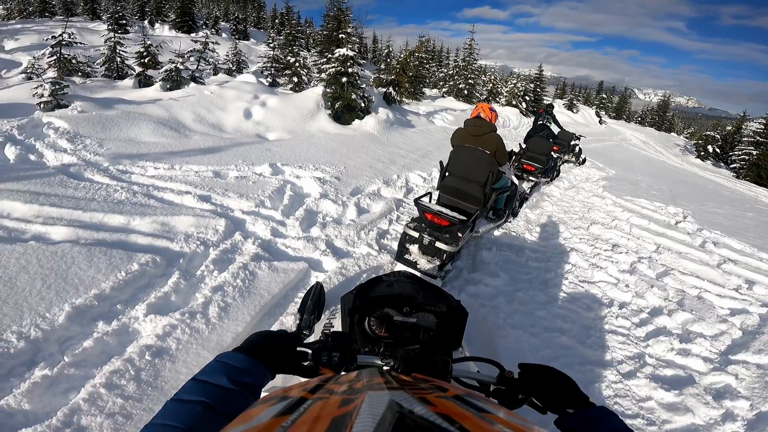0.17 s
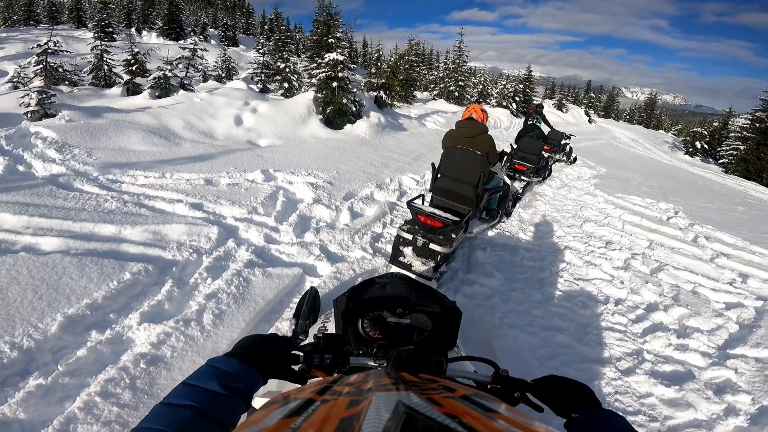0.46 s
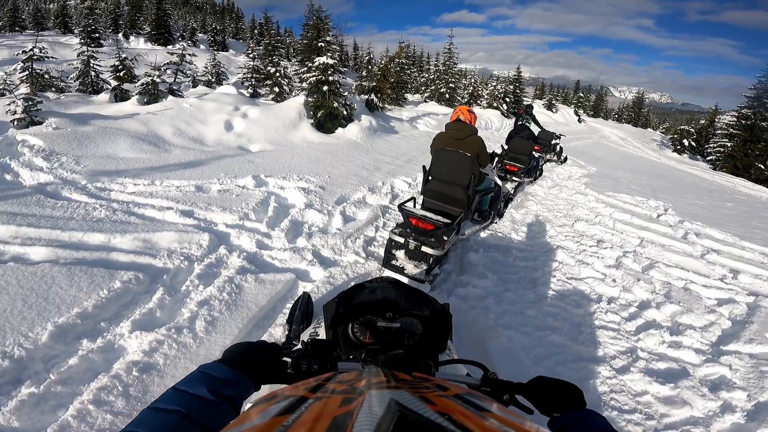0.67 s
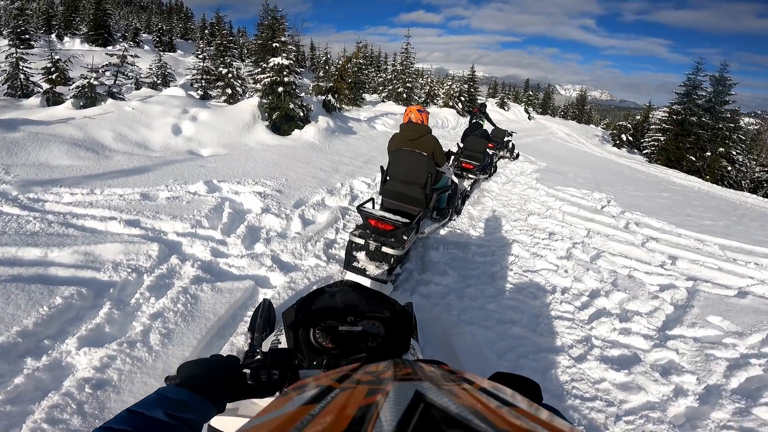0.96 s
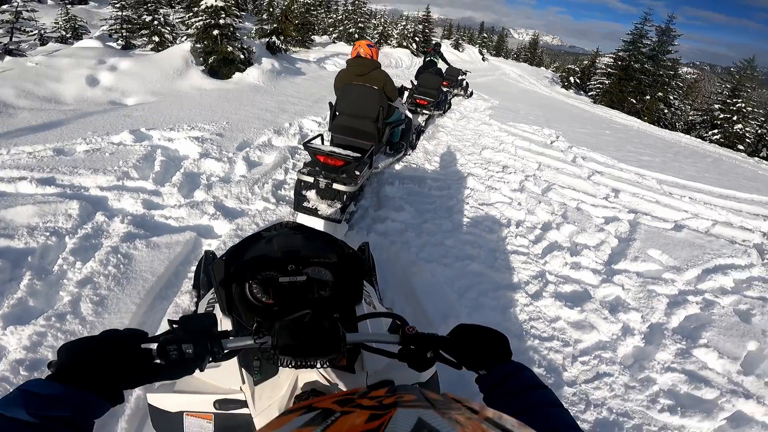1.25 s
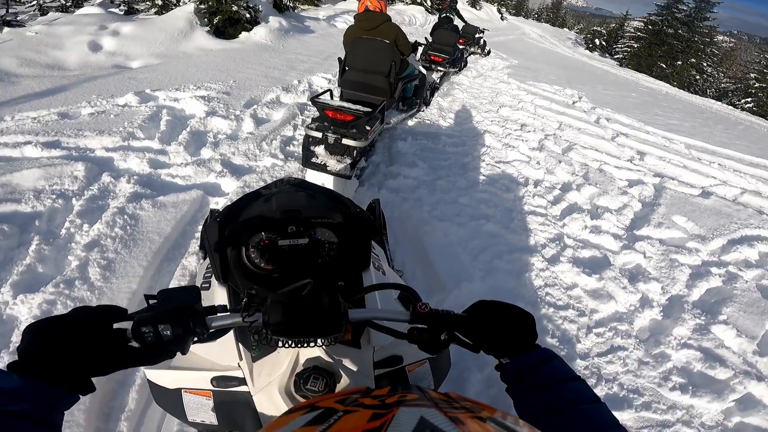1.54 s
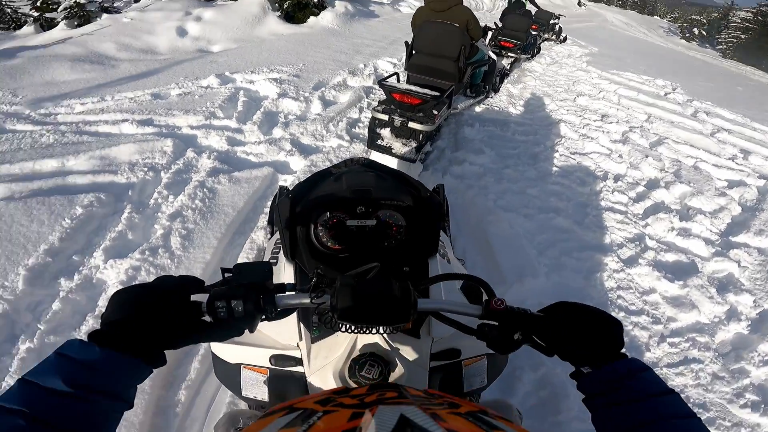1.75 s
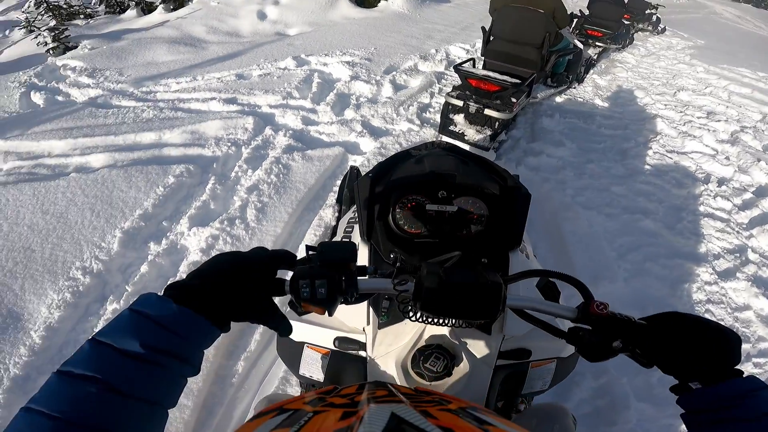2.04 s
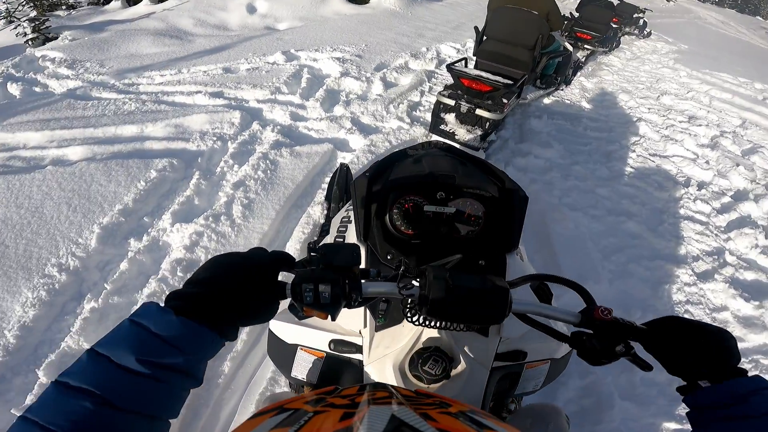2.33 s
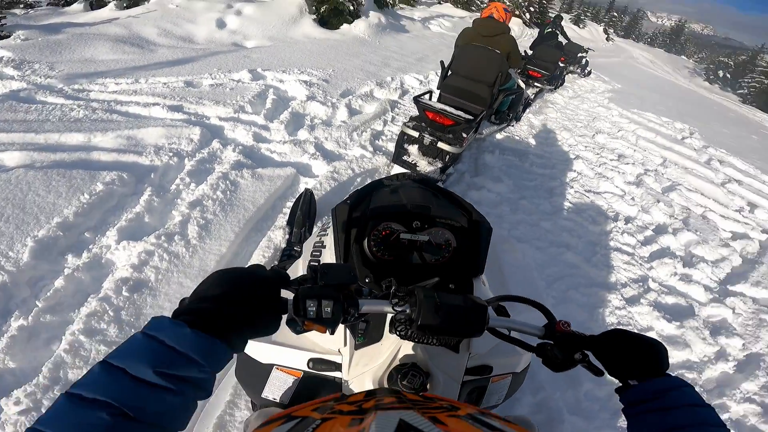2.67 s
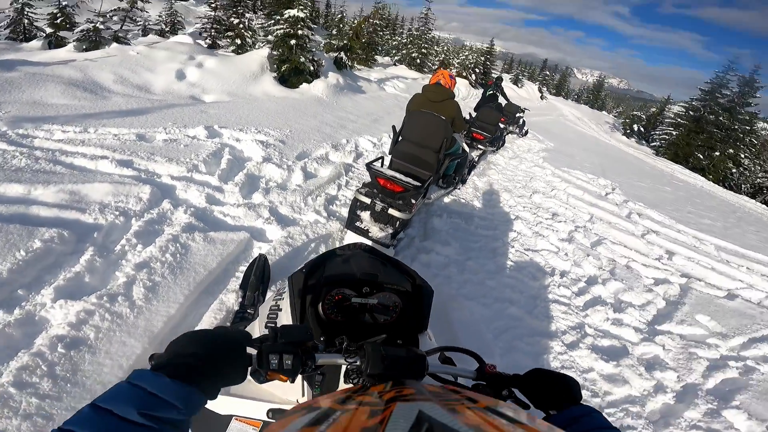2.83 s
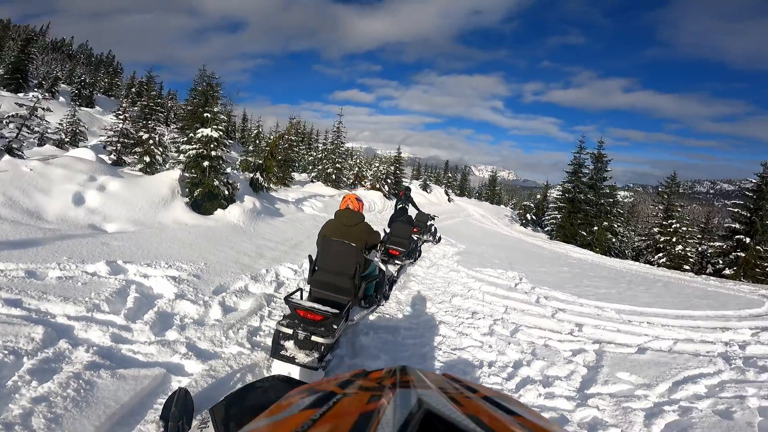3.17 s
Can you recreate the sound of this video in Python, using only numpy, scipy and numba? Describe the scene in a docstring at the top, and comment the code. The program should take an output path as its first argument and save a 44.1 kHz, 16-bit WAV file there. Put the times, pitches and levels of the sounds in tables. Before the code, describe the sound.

A snowmobile engine starts close by: while another sled putters ahead, a gritty starter grinds through three straining pushes, then the engine catches, flares and settles. Open snowfield, heard from the rider's position.

```python
"""A snowmobile's twin engine is started: its starter grinds through three compressions, then it catches,
flares and settles while its clatter dies down. A second sled idles ahead, its exhaust fainter after the start.
Each engine is uneven pairs of exhaust puffs sent through pipe filters, plus noise that swells with the firings.
The starter is gritty noise chopped by gear teeth, with a sagging howl. Clicks, pinion blows and glove ticks
are short noise bursts; a low rumble, a thin whine, a faint pump and an airbox drone are filtered noise."""
import sys
import numpy as np
from scipy import signal
from scipy.fft import rfft, irfft
from scipy.io import wavfile
from scipy.ndimage import uniform_filter1d
from numba import njit

SR = 44100
rng = np.random.default_rng(int(sys.argv[2]) if len(sys.argv) > 2 else 0)


def unload_wav(signal):
    """Save mono or channel-first audio to the path in sys.argv[1] as 16-bit WAV at rate SR, clipped to [-1, 1]."""
    wavfile.write(
        sys.argv[1],
        SR,
        np.round(np.clip(np.atleast_2d(signal).T, -1, 1) * 32767).astype(np.int16),
    )


N = 145530
T = np.arange(N) / SR  # time in seconds


def undb(db):
    """Turn decibels into a plain multiplier."""
    return 10 ** (np.asarray(db) / 20)


def curve(table, axis=1):
    """Join one column of a table by straight lines in time."""
    rows = np.array(table)
    return np.interp(T, rows[:, 0], rows[:, axis])


def unit(x):
    """Scale a sound to an rms level of 1."""
    return x / np.sqrt(np.mean(x ** 2))


def noise():
    """Plain white noise."""
    return rng.standard_normal(N)


def steady(hz):
    """A pitch that stays the same throughout."""
    return np.full(N, 1. * hz)


def colour(x, table):
    """Shape a sound by a spectrum of (pitch_hz, level_db) points."""
    rows = np.array(table)
    hz = np.fft.rfftfreq(N, 1 / SR) + 1
    gain_db = np.interp(np.log(hz), np.log(rows[:, 0]), rows[:, 1])
    return irfft(rfft(x) * undb(gain_db), N)


@njit
def svf(x, hz, width):
    """Let through a band around a moving centre pitch, with gain 1 at the centre."""
    y, band, low = np.empty(len(x)), 0., 0.
    for i in range(len(x)):
        g, k = np.tan(np.pi * hz[i] / SR), width / hz[i]
        v = (band + g * (x[i] - low)) / (1 + g * (g + k))
        band, low, y[i] = 2 * v - band, low + 2 * g * v, k * v
    return y


def rings(x, table):
    """Add up fixed resonances, each at its own rms level."""
    return sum(undb(db) * unit(svf(x, steady(hz), 1. * width)) for hz, width, db in table)


def grit(spread_db):
    """Noise of dense small impacts of uneven size."""
    size = np.minimum(rng.exponential(size=N), 6.0)
    return unit(noise() * undb(spread_db * size))


# How wide each pitch sounds; columns: pitch_hz, side_minus_mid_db
SIDE_SPECTRUM = [(110, -57.5), (200, -35), (370, -24.5), (670, -18.5), (1230, -19), (2260, -12.5),
                 (4140, -11.5), (7580, -14.5), (13900, -11)]


def wide(make, extra_db=0.):
    """Build left and right from a middle sound and an unrelated side sound."""
    mid = make()
    side = colour(make(), SIDE_SPECTRUM) * undb(extra_db)
    return np.array([mid + side, mid - side])


def cycle(speed):
    """Count engine cycles turned since the first firing."""
    turns = np.cumsum(curve(speed)) / SR
    return turns - turns[int(speed[0][0] * SR)]


SECOND_CYLINDER = .233  # share of the cycle by which it follows the first
ECHO_S, ECHO_DB = .033, -16.5  # from the snow bank
SILENCER_HZ, SILENCER_Q = 219, 5.5  # side chamber that cancels this pitch


def exhaust_puff(pipe, header):
    """A gas pulse through muffler and tailpipe, with header rings, a silencer notch and a faint echo."""
    muffler_hz, tailpipe_hz, tailpipe_order = pipe
    muffler = signal.butter(6, muffler_hz, fs=SR, output="sos")
    tailpipe = signal.butter(tailpipe_order, tailpipe_hz, "high", fs=SR, output="sos")
    puff = signal.sosfilt(np.r_[muffler, tailpipe], signal.unit_impulse(SR // 10))
    puff = puff / -puff.min()
    t = np.arange(len(puff)) / SR
    for hz, width, db in header:
        swell = np.pi * width * t * np.exp(1 - np.pi * width * t)  # rises to 1, then dies away
        puff = puff + undb(db) * np.sin(2 * np.pi * hz * t) * swell
    puff = signal.lfilter(*signal.iirnotch(SILENCER_HZ, SILENCER_Q, fs=SR), puff)
    deepest = puff.argmin()
    echo = np.r_[np.zeros(int(ECHO_S * SR)), puff][:len(puff)]
    return puff + undb(ECHO_DB) * echo, deepest


# Moments when a firing nearly misses; columns: time_s, change_db
WEAK_MOMENTS = [(.487, -9), (3.251, -10)]


def exhaust(turns, level, scatter_db, pipe, header):
    """Two close puffs per engine cycle, each of slightly different strength."""
    fired = np.zeros(N)
    for lag in (0, SECOND_CYLINDER):
        at = np.flatnonzero(np.diff(np.floor(turns - lag))) + 1
        fired[at] = undb(scatter_db * noise()[at])
    fired = fired * undb(curve(level)) * (T > level[0][0] - .005)
    for s, db in WEAK_MOMENTS:
        fired = fired * undb(db * (np.abs(T - s) < .006))
    puff, deepest = exhaust_puff(pipe, header)
    return signal.fftconvolve(fired, puff)[deepest:deepest + N]  # deepest point lands on the firing


def clatter(turns, spectrum, block, block_db, beat_db, tick_db):
    """Valve gear and gas hiss, swelling with the firings; valve ticks twice a cycle."""
    beat = undb(beat_db * np.cos(2 * np.pi * (turns - .1)))
    valve_ticks = 1 + undb(tick_db) * np.exp(-((2 * turns) % 1) / 0.019)

    def make():
        """One fresh take of hiss plus ringing metal."""
        hiss = unit(colour(grit(2.3) * beat * valve_ticks, spectrum))
        metal = unit(rings(grit(4.55) * beat, block))
        return unit(hiss + undb(block_db) * metal)
    return make


# Loudness of the low rumble; columns: time_s, level_db
RUMBLE_LEVEL = [(0, -54), (1.5, -52.5), (1.75, -45), (2.3, -53), (3.3, -51)]
RUMBLE_HZ = 35.4


def rumble():
    """Low, wide noise, strongest around one deep pitch."""
    spectrum = [(12, -20), (RUMBLE_HZ, 0), (150, -8), (230, -26), (500, -60)]
    return wide(lambda: unit(colour(noise(), spectrum)), 9.9) * undb(curve(RUMBLE_LEVEL))


# Pitch of the idling sled's whine; columns: time_s, pitch_hz
WHINE_PITCH = [(0, 1049), (1.1, 1000), (1.25, 973)]
WHINE_DB = -83.5


def whine():
    """A thin whine from the sled ahead: a very narrow band of noise."""
    return unit(svf(noise(), curve(WHINE_PITCH), 11.0)) * undb(WHINE_DB)


# Speed of the engine ahead, from a first-cylinder firing; columns: time_s, cycles_per_s
AHEAD_TURNING = [(0.0443, 14.04), (0.45, 14.14), (0.6, 14.63), (0.8, 15.17), (0.95, 14.27), (1.1, 14.53),
                 (1.3, 14.75), (1.5, 14.06), (1.62, 14.69), (1.8, 14.29), (2.1, 13.98), (2.6, 13.87),
                 (2.9, 14.6), (3.3, 15.42)]
# Strength of its exhaust; columns: time_s, level_db
AHEAD_EXHAUST = [(0, -31.5), (1.94, -31.5), (1.98, -38), (2.2, -43), (2.7, -41.5), (3.3, -41)]
# Its muffler and tailpipe: muffler_lowpass_hz, tailpipe_highpass_hz, tailpipe_order
AHEAD_PIPE = (130, 63, 3)
# Header and airbox rings struck by each firing; columns: pitch_hz, width_hz, level_db against the puff
AHEAD_HEADER = [(188.2, 30, -25), (334, 42, -40.5)]
# Spectrum of its mechanical noise; columns: pitch_hz, level_db
AHEAD_HISS = [(140, -22.5), (230, 9.5), (309, -9.5), (509, -7.5), (683, -13), (1740, -13), (1960, -18),
              (5530, -36.5), (14300, -51.5)]
# Resonance of its block and cowling; columns: pitch_hz, width_hz, level_db
AHEAD_BODY = [(1740, 130, 3.5)]
AHEAD_SCATTER_DB, AHEAD_NOISE_DB, AHEAD_WIDER_DB = 1.5, -67, 5.5


def sled_ahead():
    """Idling engine ahead: central exhaust puffs and steady, wider mechanical noise."""
    turns = cycle(AHEAD_TURNING)
    puffs = exhaust(turns, AHEAD_EXHAUST, AHEAD_SCATTER_DB, AHEAD_PIPE, AHEAD_HEADER)
    metal = wide(clatter(turns, AHEAD_HISS, AHEAD_BODY, -13.5, 1.3, 1.3), AHEAD_WIDER_DB)
    return puffs + metal * undb(AHEAD_NOISE_DB)


# Dry ticks of gloves on the controls; columns: start_s, level_db, pitch_hz
GLOVE_TICKS = [(0.835, -74, 3000), (0.98, -70, 4450), (1.005, -69.5, 5530), (1.213, -73, 4000)]
TICK_S = 0.0046  # fade time


def glove_ticks():
    """Short snaps of noise around one pitch, cut in sharply and fading fast."""
    out = np.zeros(N)
    for s, db, hz in GLOVE_TICKS:
        fade = (T > s) * np.exp(-np.abs(T - s) / TICK_S)
        out += undb(db) * fade * unit(svf(noise(), steady(hz), 0.31 * hz))
    return out


def hits(events, modes, chatter_s):
    """Each blow is a short rattle of contacts that sets fixed pitches ringing."""
    out, t = np.zeros(N + 8000), np.arange(4000) / SR
    ring = sum(undb(db) * np.sin(2 * np.pi * hz * t) * 1000 ** (-t / t60) for hz, db, t60 in modes)
    for s, db in events:
        contacts = rng.standard_normal(4000) * np.exp(-t / chatter_s)
        y = signal.fftconvolve(contacts, ring)
        start = int(s * SR)
        out[start:start + len(y)] += undb(db) * y / np.abs(y).max()
    return out[:N]


# Clicks of switches and plastic; columns: start_s, peak_db
CLICK_TIMES = [(.0088, -34)]
# Ringing pitches of the plastic; columns: pitch_hz, level_db, fall_by_60_db_s
CLICK_RINGS = [(2770, 0.5, 0.011), (3360, -1, 0.0041), (4460, 11, 0.0029), (5330, -9, 0.011),
               (7560, -16, 0.0079)]


def clicks():
    """Plastic parts knock together and ring briefly."""
    return hits(CLICK_TIMES, CLICK_RINGS, chatter_s=.0017)


# The starter pinion throws in and kicks out; columns: start_s, peak_db
PINION_TIMES = [(1.4456, -43), (2.0255, -36.5)]
# Ringing pitches of the pinion; columns: pitch_hz, level_db, fall_by_60_db_s
PINION_RINGS = [(3700, -1, .007), (4350, 2, .006), (5050, 1, .006), (7020, -8, .012), (8600, -6, .005),
                (11700, -9, .005)]


def pinion():
    """The small starter gear strikes as it moves in and out."""
    return hits(PINION_TIMES, PINION_RINGS, chatter_s=.0007)


# Three pushes against compression, each with one slip; columns: start_s, end_s, grind_start_db,
# grind_end_db, slip_s, howl_peak_s, howl_db, howl_start_hz, howl_end_hz
COMPRESSIONS = [(1.447, 1.536, -57.5, -48, 1.512, 1.5, -48, 1100, 928),
                (1.601, 1.651, -45, -48, 1.629, 1.612, -41.5, 1101, 920),
                (1.842, 1.888, -50.5, -45, 1.876, 1.866, -40, 1134, 930)]
STRAIN_ATTACK_S, STRAIN_RELEASE_S = .004, .009
HOWL_RISE_S, HOWL_FALL_S, HOWL_REST_DB = .016, .011, -11.5
SLIP_S, SLIP_DB = .005, -6


def strain_curves():
    """Grind strength, howl strength and sagging howl pitch as the starter meets each compression."""
    load, sing, hz = 0, 0, steady(1000)
    for t0, t1, db0, db1, slip, peak, howl_db, hz0, hz1 in COMPRESSIONS:
        gate = np.clip((T - t0) / STRAIN_ATTACK_S, 0, 1) * np.exp(-np.maximum(T - t1, 0) / STRAIN_RELEASE_S)
        gate = gate * undb(SLIP_DB * np.exp(-((T - slip) / SLIP_S) ** 2))
        load = load + gate * undb(np.interp(T, [t0, t1], [db0, db1]))
        swell = np.exp(-np.maximum((peak - T) / HOWL_RISE_S, (T - peak) / HOWL_FALL_S))
        sing = sing + gate * undb(howl_db) * (swell + undb(HOWL_REST_DB))
        hz = np.where(T > t0 - .01, np.interp(T, [t0, t1], [hz0, hz1]), hz)
    return load, sing, hz


# Whirr of the spinning starter; columns: time_s, level_db
STARTER_SPIN = [(1.446, -56.5), (1.7, -57.5), (1.8, -54.5), (1.93, -55.5)]
# Spectrum of the starter's grinding; columns: pitch_hz, level_db
STARTER_GRIND = [(300, -12), (818, -9), (977, -5), (1780, -5.5), (2270, -13), (2500, -12), (5980, -26),
                 (7380, -23.5), (14300, -39.5)]
# Resonances of its housing; columns: pitch_hz, width_hz, level_db
STARTER_HOUSING = [(1330, 47, -4), (1644, 33, -9), (1817, 57, -8.5), (2100, 55, -6), (2454, 93, -5),
                   (2865, 30, -10.5), (3434, 55, -9.5)]
# Squeal heard only while it strains; columns: pitch_hz, width_hz, level_db against the grind
STRAIN_SQUEAL = [(7270, 73, -19)]
TEETH_HZ, TEETH_DEPTH = 170, .45
HOWL_WIDTH_HZ = 45.  # of each of two passes
SPIN_HZ = 5500  # the free-spinning starter is duller than the strained one


def starter():
    """Gear teeth rasp in the housing, hardest against compression, where the ring gear howls."""
    wander = unit(uniform_filter1d(noise(), size=2000))  # keeps the teeth from being too regular
    teeth = 1 + TEETH_DEPTH * np.sin(2 * np.pi * TEETH_HZ * T + 5.8 * wander)
    rasp = unit(colour(grit(2.2) * teeth, STARTER_GRIND))
    housing = unit(rings(grit(3.56) * teeth, STARTER_HOUSING))
    grind = rasp + undb(-2.0) * housing
    squeal = rings(grit(2.5) * teeth, STRAIN_SQUEAL)

    load, sing, hz = strain_curves()
    howl = svf(svf(grit(0.69), hz, HOWL_WIDTH_HZ), hz, HOWL_WIDTH_HZ)
    howl = howl / np.sqrt(uniform_filter1d(howl ** 2, size=900))  # even out its loudness

    whirr = signal.sosfilt(signal.butter(2, SPIN_HZ, fs=SR, output="sos"), grind)
    spin = undb(curve(STARTER_SPIN)) * (T > STARTER_SPIN[0][0]) * (T < STARTER_SPIN[-1][0])
    return (unit(grind) + squeal) * load + unit(whirr) * spin + howl * sing


PUMP_S, PUMP_HZ, PUMP_DB = 1.3, 5900, -108


def fuel_pump():
    """The fuel pump primes until the starter spins: a faint, narrow band of noise."""
    running = (T > PUMP_S) * (T < STARTER_SPIN[0][0])
    return unit(svf(noise(), steady(PUMP_HZ), 60.) * running) * undb(PUMP_DB)


# Drone of the rider's airbox; columns: time_s, level_db, pitch_hz
AIRBOX_DRONE = [(1.9, -58, 247), (1.98, -53.5, 268), (2.13, -54, 306), (2.5, -58.5, 282.5), (3.0, -58, 281),
                (3.3, -62.5, 265)]
DRONE_WIDTH_HZ = 55.4


def airbox_drone():
    """Noisy intake air blows the airbox at a moving pitch."""
    hz = curve(AIRBOX_DRONE, axis=2)
    air = svf(svf(noise(), hz, DRONE_WIDTH_HZ), hz, 5.7 * DRONE_WIDTH_HZ)
    return unit(air) * undb(curve(AIRBOX_DRONE)) * (T > AIRBOX_DRONE[0][0])


# Speed of the rider's engine, from a first-cylinder firing; columns: time_s, cycles_per_s
OWN_TURNING = [(1.9315, 9.49), (2.02, 15.51), (2.08, 19.17), (2.16, 17.96), (2.25, 17.84), (2.45, 18.11),
               (2.6, 17.36), (2.8, 16.87), (2.9, 17.16), (3.02, 15.85), (3.3, 15.89)]
# Strength of its exhaust; columns: time_s, level_db
OWN_EXHAUST = [(1.93, -35), (1.955, -26.5), (2.03, -29), (2.201, -28), (2.7, -28), (3.3, -29.5)]
# Its muffler and tailpipe: muffler_lowpass_hz, tailpipe_highpass_hz, tailpipe_order
OWN_PIPE = (152, 57, 5)
# Header and airbox rings struck by each firing; columns: pitch_hz, width_hz, level_db against the puff
OWN_HEADER = [(163.4, 75, -12.5), (273.9, 17, -29.5)]
# Spectrum of its mechanical noise; columns: pitch_hz, level_db
OWN_HISS = [(250, -25), (430, -4.5), (688, -5.5), (857, -3), (1290, -4.5), (2390, -10), (3070, -16),
            (7620, -28), (14300, -45.5)]
# Resonances of its block and cowling; columns: pitch_hz, width_hz, level_db
OWN_BODY = [(674, 52, 2.5), (946, 10, -7.5), (1299, 22, -2.5), (2440, 110, -5.5), (3316, 82, -11.5),
            (7230, 14, -22)]
# Loudness of its clatter; columns: time_s, level_db
OWN_CLATTER_LEVEL = [(1.9, -83), (1.93, -55.5), (2.05, -53), (2.17, -55.5), (2.25, -58), (2.45, -59.5),
                     (2.8, -62.5), (3.3, -70.5)]
OWN_SCATTER_DB = 1.0


def own_engine():
    """The rider's engine catches, flares and settles: exhaust puffs with fading metal clatter."""
    turns = cycle(OWN_TURNING)
    puffs = exhaust(turns, OWN_EXHAUST, OWN_SCATTER_DB, OWN_PIPE, OWN_HEADER)
    metal = wide(clatter(turns, OWN_HISS, OWN_BODY, -3.5, 1.3, 5.2))
    return puffs + metal * undb(curve(OWN_CLATTER_LEVEL)) * (T > OWN_CLATTER_LEVEL[0][0])


def scene():
    """Add all sources, from the background to the rider's engine."""
    background = rumble() + whine() + sled_ahead()
    small = glove_ticks() + clicks() + pinion() + fuel_pump()
    return background + small + wide(starter) + airbox_drone() + own_engine()


# Unequal tone of the two microphone ports; columns: pitch_hz, left_minus_right_db
PORT_TONE = [(170, 0), (400, -1.0), (1200, -.6), (2500, 0), (7500, 1.7), (13000, -1)]
LEFT_LAG = 0.4  # share of a sample by which the left port hears later
TREBLE_HZ, TOP_HZ = 9850, 14500


def record(dry):
    """Two slightly unequal microphone ports, then a dulled treble and a steep cut at the top."""
    rows = np.array(PORT_TONE)
    left = colour(dry[0], rows * [1, .5])
    right = colour(dry[1], rows * [1, -.5])
    left = signal.lfilter([1 - LEFT_LAG, 1 + LEFT_LAG], [1 + LEFT_LAG, 1 - LEFT_LAG], left)
    dull = signal.sosfilt(signal.butter(2, TREBLE_HZ, fs=SR, output="sos"), np.array([left, right]))
    return signal.sosfilt(signal.ellip(8, .2, 70, TOP_HZ, fs=SR, output="sos"), dull)


dry = scene()
out = record(dry)
unload_wav(out)
```